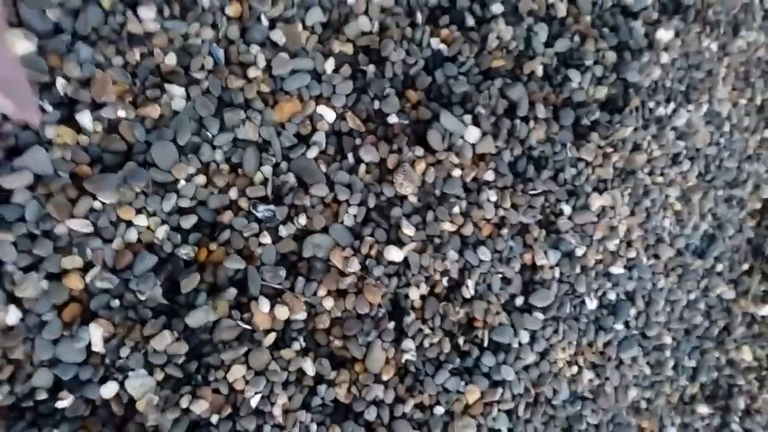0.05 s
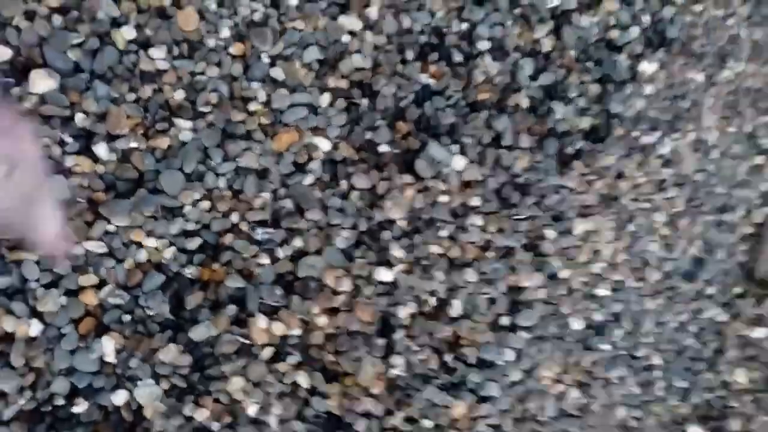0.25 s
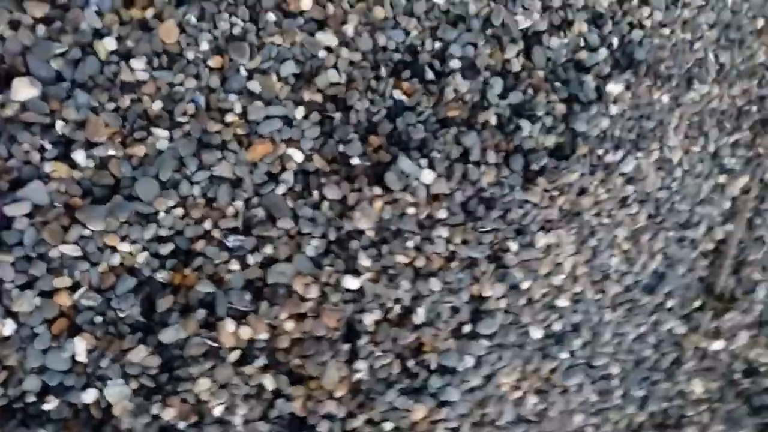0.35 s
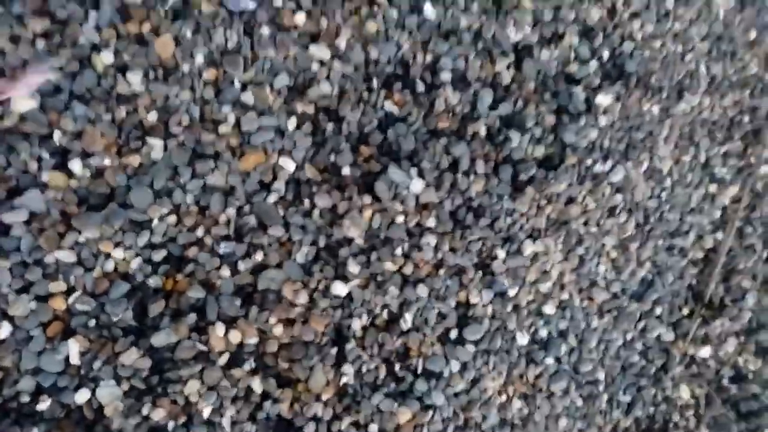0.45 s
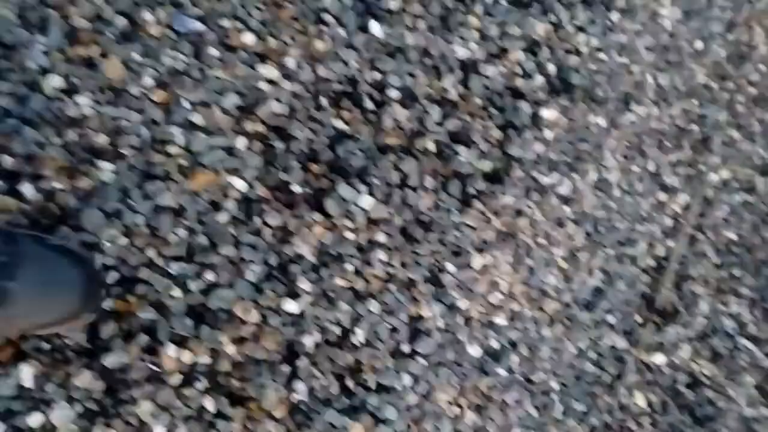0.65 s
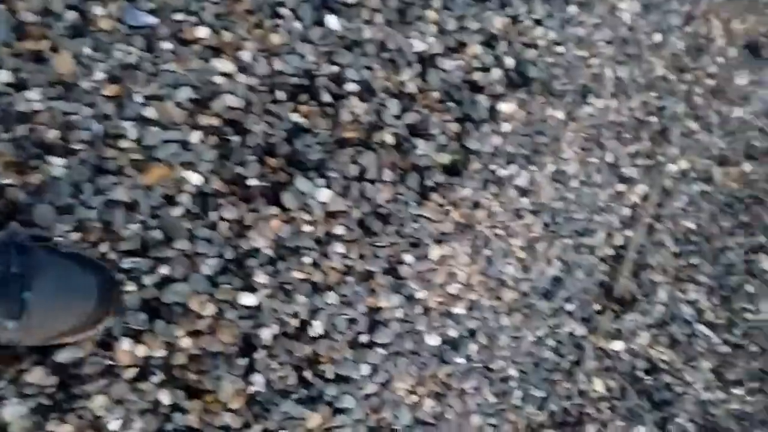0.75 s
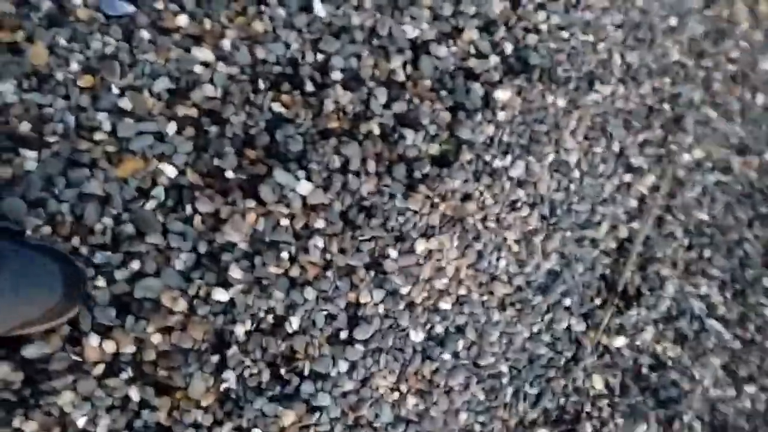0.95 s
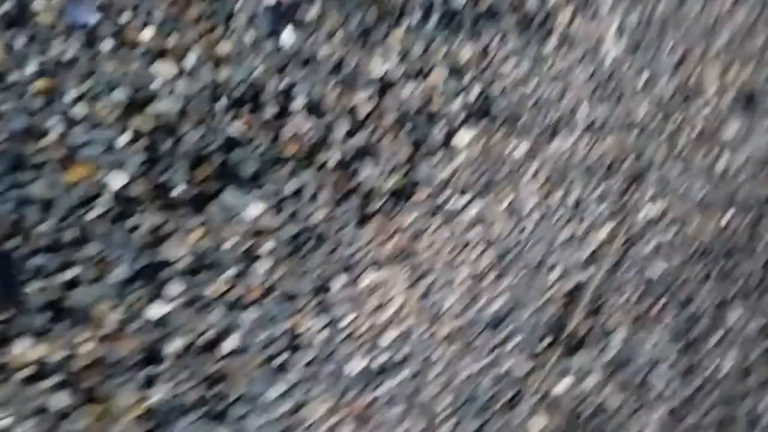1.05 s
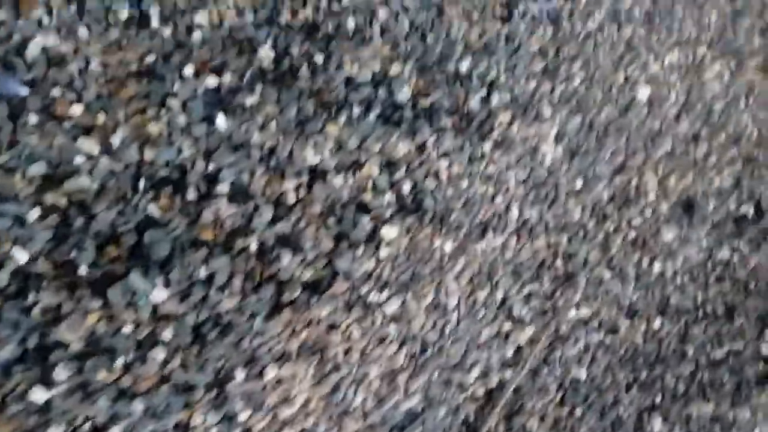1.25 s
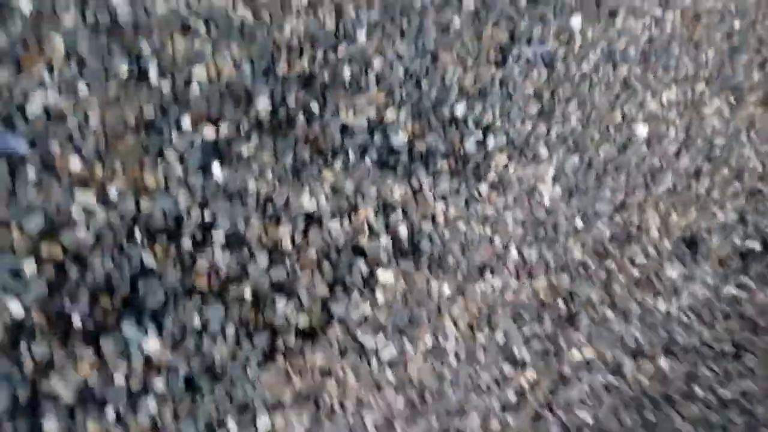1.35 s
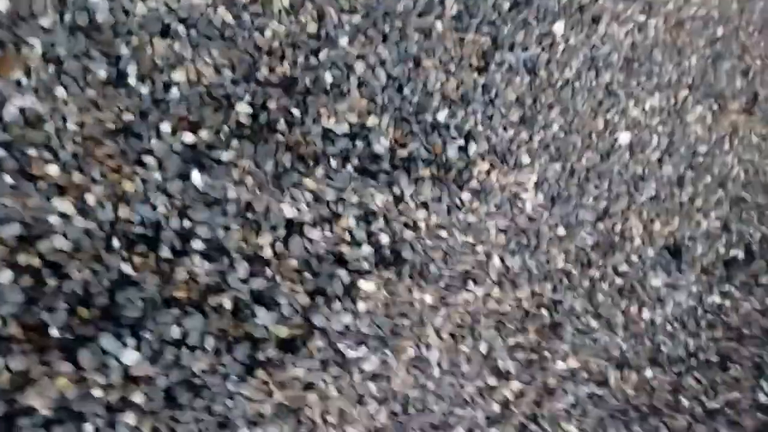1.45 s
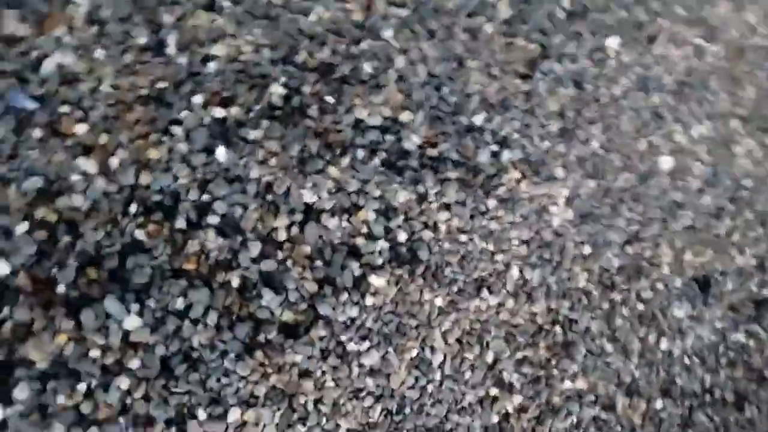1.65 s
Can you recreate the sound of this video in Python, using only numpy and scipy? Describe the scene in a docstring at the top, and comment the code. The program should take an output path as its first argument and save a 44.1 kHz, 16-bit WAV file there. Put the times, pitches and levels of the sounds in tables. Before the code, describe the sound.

A hand rubs over the microphone, close and almost entirely on the left, dotted with small ticks. At about 0.2 seconds a dull knock hits the case. From 0.6 to 0.8 seconds the hand drags in a short, gritty crunch. The rubbing eases, then brushes past again with a light hiss from 1.1 until 1.7 seconds. A faint wash of sea and air continues in both ears throughout.

```python
"""Handling noise on a walk over a shingle beach, nearly all of it contact at the left microphone.
A hand rubs over the microphone's case in stick-slip friction, dotted with small ticks. At 0.23 s a
knock excites the modes of the case; from 0.63 s the hand drags in a short, gritty crunch, and then it
brushes past again. Throughout, a faint wash of sea and air lies underneath in both ears."""
import sys
import numpy as np
from scipy import signal
from scipy.fft import rfft, irfft, next_fast_len
from scipy.io import wavfile

SR = 44100
rng = np.random.default_rng(int(sys.argv[2]) if len(sys.argv) > 2 else 0)


def dump(signal):
    """Clip the signal to [-1, 1] and save it as 16-bit WAV at the path in sys.argv[1]."""
    limited = np.clip(np.atleast_2d(signal).T, -1, 1)
    pcm = np.round(limited * 32767).astype(np.int16)
    wavfile.write(sys.argv[1], SR, pcm)


N = 74970
T = np.arange(N) / SR

# Loudness of the four bands of the rubbing. Each row: time in seconds, level in dB.
RUMBLE_LEVEL = [(0, -51), (.1, -50), (.22, -50), (.3, -58), (.37, -52.5), (.43, -50.5), (.5, -51.5),
                (.53, -65), (.605, -59), (.64, -51), (.75, -51), (.85, -55), (.89, -64.5), (1.02, -66),
                (1.2, -59.5), (1.35, -61), (1.48, -55), (1.6, -48.5), (1.7, -58.5)]
SCUFF_LEVEL = [(0, -57), (.22, -54), (.3, -59.5), (.4, -56.5), (.46, -60), (.505, -54.5), (.535, -68.5),
               (.61, -62), (.66, -55), (.83, -57), (.9, -61.5), (1.03, -65), (1.24, -56), (1.305, -64),
               (1.42, -57), (1.46, -49.5), (1.52, -55.5), (1.58, -47), (1.7, -60.5)]
RASP_LEVEL = [(0, -55.5), (.21, -52), (.29, -59), (.5, -64), (.535, -75), (.61, -64), (.65, -50),
              (.83, -51.5), (.88, -62.5), (.96, -63), (1.02, -66.5), (1.12, -57), (1.2, -60), (1.25, -57.5),
              (1.31, -59.5), (1.47, -51.5), (1.59, -55.5), (1.7, -59)]
HISS_LEVEL = [(0, -65), (.05, -89), (.11, -56.5), (.21, -63.5), (.29, -78), (.5, -70), (.55, -87),
              (.61, -70), (.65, -42), (.79, -52.5), (.89, -62), (.97, -63.5), (1.02, -72), (1.09, -52),
              (1.16, -61), (1.19, -70), (1.3, -66.5), (1.375, -49.5), (1.415, -53), (1.45, -46.5),
              (1.485, -48), (1.52, -59.5), (1.63, -63), (1.7, -54)]
# Their spectra. Each row: frequency in Hz, relative level in dB.
RUMBLE_SPECTRUM = [(25, -16), (50, -20), (90, -5.5), (135, -1), (175, 0.5), (230, -5), (310, -2), (410, -7),
                   (600, -8.5), (1000, -26.5), (2500, -60)]
SCUFF_SPECTRUM = [(200, -27.5), (450, -14), (620, 1), (1100, -3.5), (1400, -3.5), (1750, -6), (2500, -8),
                  (3200, -13), (7000, -56)]
RASP_SPECTRUM = [(1200, -19.5), (2200, -1), (2600, -10.5), (3050, -4), (3450, -0.5), (3900, 1.5),
                 (5000, -2), (6100, -0.5), (6900, -8), (7800, -18.5), (12000, -27.5)]
HISS_SPECTRUM = [(3000, -14), (6500, -9), (8200, -10), (9500, -4.5), (11300, -3), (13500, -7.5),
                 (14200, -6), (15200, -1), (16000, 1)]
def rubbing():
    """Stick-slip friction: the hand slides over the case in tiny slips that merge into juddering noise."""
    def band(curve, spectrum, judder_hz, judder_db):
        envelope = from_db(np.interp(T, *np.transpose(curve)))
        return envelope * colour(slips() * judder(judder_hz, judder_db), spectrum)
    return (band(RUMBLE_LEVEL, RUMBLE_SPECTRUM, judder_hz=55.6, judder_db=2.0)
            + band(SCUFF_LEVEL, SCUFF_SPECTRUM, judder_hz=89, judder_db=2.0)
            + band(RASP_LEVEL, RASP_SPECTRUM, judder_hz=118, judder_db=1.94)
            + band(HISS_LEVEL, HISS_SPECTRUM, judder_hz=120, judder_db=2.5))


# Knocks and soft bumps. Each row: start in seconds, relative impulse in dB, corner frequency in Hz.
CONTACTS = [(.2316, 2.5, 8500), (0.2367, -3, 1600), (0.2438, -4.5, 202), (0.2581, -4, 171),
            (0.332, -19.5, 500), (0.572, -30.5, 1800), (0.63, -18, 1000), (.6352, -16, 1400),
            (0.647, -19, 350), (.672, -40, 1300), (0.703, -2.5, 45), (1.6056, -26, 3000)]
# Modes of the case. Each row: frequency in Hz, gain in dB, time to decay by 60 dB in seconds.
CASE_MODES = [(100, -33, 0.073), (127.5, -26, 0.076), (209.5, -25, 0.059), (244.3, -22, 0.09),
              (280, -36, 0.15), (416, -26.5, 0.063), (1064, -32.5, 0.037)]
# Spectrum of the dull crack. Each row: frequency in Hz, relative level in dB.
CRACK_SPECTRUM = [(30, -17), (80, -4), (220, 6.5), (450, 3.5), (650, 0), (950, 5.5), (1600, 0.5),
                  (2300, -6), (3400, -16), (4200, -13), (5500, -33), (9000, -37), (16000, -47)]
def knocks():
    """Impact excitation: a force pulse cracks and rings the case; a softer, longer pulse is darker."""
    force = np.zeros(N)
    for start_s, db, corner_hz in CONTACTS:
        age = np.maximum(np.arange(N) - int(start_s * SR), 0) * 2 * np.pi * corner_hz / SR
        pulse = age * np.exp(-np.minimum(age, 50))
        force += from_db(db) * pulse / pulse.sum()
    body = 0
    for hz, db, t60 in CASE_MODES:
        radius, angle = np.exp(-np.log(1000) / (t60 * SR)), 2 * np.pi * hz / SR
        feedback = [1, -2 * radius * np.cos(angle), radius * radius]
        body += from_db(db) * signal.lfilter([0, np.sin(angle)], feedback, force + 1e-18)
    return low_cut(body, hz=95) - colour(force, CRACK_SPECTRUM)  # the ringing is kept out of the deepest bass, below about 95 Hz


# Snags in the drag. Each row: peak time in seconds, level in dB, half length in seconds, ring in Hz.
SNAGS = [(.637, -35, .003, 4120), (.657, -43, .002, 15000), (0.6759, -34, 0.0015, 10500),
         (.693, -40, 0.0016, 6050), (0.7012, -38, 0.0027, 6200), (0.7112, -37, 0.0011, 5960),
         (.724, -44, 0.0018, 10830), (0.7475, -36.5, 0.0052, 6330), (0.753, -45.5, 0.005, 4070),
         (.834, -49.5, 0.0018, 6230)]
# Spectrum of the grit. Each row: frequency in Hz, relative level in dB.
GRIT_SPECTRUM = [(200, -21), (900, 10.5), (1600, -16), (3200, -9), (4100, 8), (5100, -5.5), (6200, 4),
                 (7000, 0), (8200, 0), (10600, 4.5), (13500, 0.5), (15200, 5.5), (16000, -2)]
def crunch():
    """Coarse stick-slip: over a bed of grit, snags catch and let go, each with its own resonance."""
    start_s, end_s, attack_s, release_s = .629, .75, .0014, .043
    bed = np.clip((T - start_s) / attack_s, 0, 1) * np.exp(-np.maximum(T - end_s, 0) / release_s)
    power, rings = (from_db(-48) * bed) ** 2, 0
    for peak_s, db, half_length_s, hz in SNAGS:
        force = from_db(db) * np.exp(-.5 * ((T - peak_s) / half_length_s) ** 2)
        power += force ** 2
        rings += force * ringing_slips(hz, width_hz=530)
    grit = slips(per_s=11000, spread_db=2.4) * judder(rate_hz=250, depth_db=1.5)  # slips in clumps
    return colour(np.sqrt(power) * grit, GRIT_SPECTRUM) + from_db(-5.5) * rings


# Port resonances. Each row: start and end in seconds, frequency and nominal width in Hz, level in dB.
PORT_RESONANCES = [(-.03, 0.28, 2200, 380, -55.5), (-.03, 0.192, 3600, 880, -50.5),
                   (0.057, 0.242, 15300, 900, -59), (.27, 0.45, 3860, 427, -65), (.27, .52, 5730, 400, -86),
                   (0.68, 0.98, 2190, 244, -59.5), (0.707, 1, 5840, 670, -62.5),
                   (0.954, 1.153, 2280, 258, -61.5), (1.091, 1.17, 5970, 990, -56),
                   (1.21, 1.32, 1460, 328, -71), (1.365, 1.5, 14900, 450, -49),
                   (1.512, 1.655, 1640, 290, -56), (1.52, 1.73, 15200, 600, -66)]
def port_ringing():
    """Cavity resonance: slips ring the microphone port while the hand partly covers it."""
    return sum(from_db(db) * covering(start_s, end_s) * ringing_slips(hz, width_hz)
               for start_s, end_s, hz, width_hz, db in PORT_RESONANCES)


def port_notch(friction):
    """Antiresonance: the covered port swallows one band of the friction noise."""
    depth = .65 * covering(start_s=.63, end_s=1.36)
    return friction - depth * resonate(friction, hz=3050, width_hz=700)


# Small gritty ticks. Each row: peak time in seconds, level in dB, ring frequency in Hz.
TICKS = [(0.0629, -42.5, 10200), (.094, -45.5, 12800), (.101, -41, 14600), (0.2028, -43.5, 6500),
         (0.561, -53.5, 3000), (0.5722, -47.5, 2190), (0.9409, -43.5, 5560), (1.3166, -59, 7100),
         (1.384, -47, 12500), (1.606, -47, 4000), (1.669, -42, 15200), (1.684, -40, 15600)]
def ticks(fall_s=.00098):
    """Transient friction: a single catch releases a very short cluster of ringing slips."""
    sound, rise_s = 0, fall_s / 10
    for peak_s, db, hz in TICKS:
        envelope = np.exp(-np.maximum(peak_s - T, 0) / rise_s - np.maximum(T - peak_s, 0) / fall_s)
        sound += from_db(db) * envelope * ringing_slips(hz, width_hz=1070)
    return sound


# Path to the far microphone. Each row: frequency in Hz, relative gain in dB.
FAR_RESPONSE = [(100, -26), (280, -16), (520, 2), (1000, 8), (1500, -20), (4000, -33), (12000, -40)]
def far_knocks(thumps, delay_s=.0013):
    """Transmission loss: the knocks reach the far microphone late, faint and filtered."""
    return from_db(-44) * np.interp(T - delay_s, T, colour(thumps, FAR_RESPONSE))


# Spectrum of sea and air. Each row: frequency in Hz, relative level in dB.
WASH_SPECTRUM = [(25, 0), (50, -17), (100, 0), (200, -6.5), (400, -7.5), (850, -13), (1500, -17.5),
                 (3200, -18), (6000, -21.5), (8000, -31), (13800, -32.5), (15000, -22), (16000, -26)]
def sea_wash():
    """Diffuse sound: distant sea and air arrive as noise uncorrelated between the ears."""
    return from_db(-70.5) * np.array([colour(ear, WASH_SPECTRUM) for ear in rng.standard_normal((2, N))])


def slips(per_s=15000, spread_db=1):
    """Shot noise: stick-slip clicks of random time, size and sign, at rms 1."""
    sizes = from_db(spread_db * np.minimum(rng.exponential(1, N), 5)) * rng.choice([-1, 1], N)
    return unit_rms(sizes * (rng.random(N) < per_s / SR))


def ringing_slips(hz, width_hz):
    """Forced resonance: slips drive two resonators in series, at rms 1."""
    first_stage = resonate(slips(), hz, 2 * width_hz)
    return unit_rms(resonate(first_stage, hz, 2 * width_hz))


def judder(rate_hz, depth_db):
    """Random amplitude modulation: a wavering gain of mean power 1."""
    slow = signal.sosfilt(signal.butter(2, rate_hz, fs=SR, output="sos"), rng.standard_normal(2 * N))[N:]
    return unit_rms(from_db(depth_db * unit_rms(slow)))


def covering(start_s, end_s, fade_s=.072):
    """Occlusion: a gate fades in as the hand covers the port and out as it clears it."""
    return np.clip(np.minimum(T - start_s, end_s - T) / fade_s + .5, 0, 1)


def resonate(x, hz, width_hz):
    """A damped resonator with unit gain at its peak."""
    radius = np.exp(-np.pi * width_hz / SR)
    feedback = [1, -2 * radius * np.cos(2 * np.pi * hz / SR), radius * radius]
    return signal.lfilter(np.array([1, 0, -1]) * (1 - radius * radius) / 2, feedback, x)


def colour(x, spectrum):
    """Minimum-phase filtering to a given spectrum; white noise keeps its power."""
    size = 2 * next_fast_len(N)
    hz, db = np.transpose(spectrum)
    bin_hz = np.arange(size // 2 + 1) * SR / size
    gain = unit_rms(from_db(np.interp(np.log(bin_hz + 1), np.log(hz), db)))
    cepstrum = irfft(np.log(gain))
    cepstrum[1:size // 2] *= 2  # folding onto positive time makes the filter causal
    cepstrum[size // 2 + 1:] = 0
    return irfft(rfft(x, size) * np.exp(rfft(cepstrum)))[:N]


def low_cut(x, hz):
    """Second-order high-pass filtering."""
    return signal.sosfilt(signal.butter(2, hz, "high", fs=SR, output="sos"), x)


def from_db(db):
    """Decibels as an amplitude ratio."""
    return 10 ** (np.asarray(db) / 20)


def unit_rms(x):
    """Normalisation to rms 1."""
    return x / np.sqrt(np.mean(x ** 2) + 1e-20)


def scene():
    """Superposition: all contact on the left, a trace of the knocks on the right, the wash in both."""
    friction = port_notch(rubbing() + port_ringing() + crunch()) + ticks()
    thumps = knocks()
    return np.array([friction + thumps, far_knocks(thumps)]) + sea_wash()


def record(dry, cutoff_hz=15500):
    """Band limiting: the deepest bass is rolled off and the top is cut steeply."""
    return signal.sosfilt(signal.ellip(10, .2, 70, cutoff_hz, fs=SR, output="sos"), low_cut(dry, hz=35))


dry = scene()
out = record(dry)
dump(out)
```